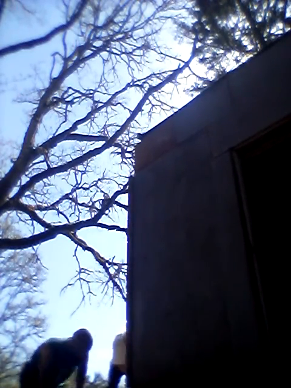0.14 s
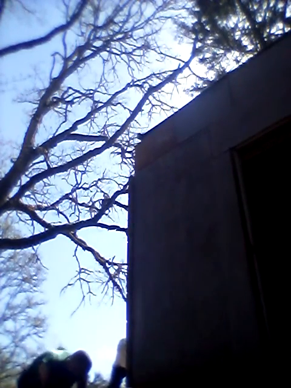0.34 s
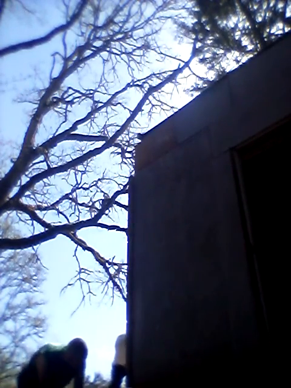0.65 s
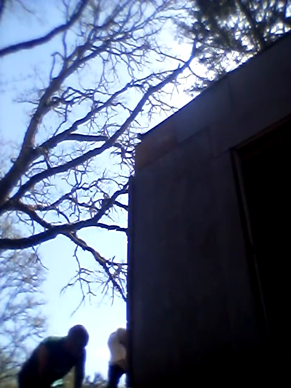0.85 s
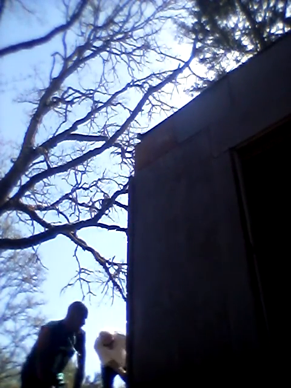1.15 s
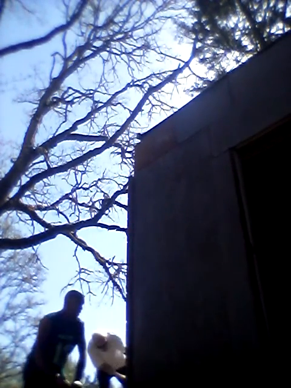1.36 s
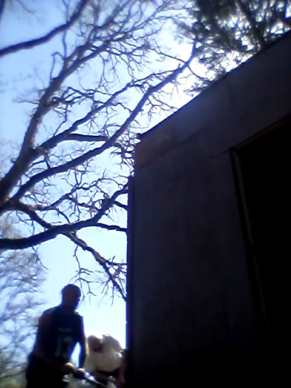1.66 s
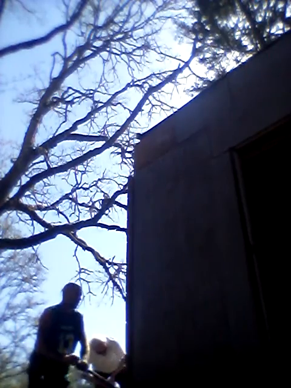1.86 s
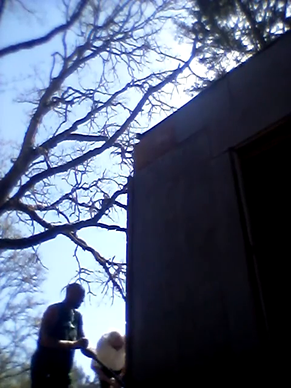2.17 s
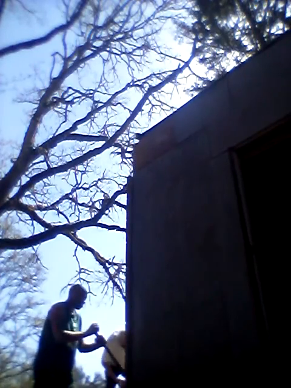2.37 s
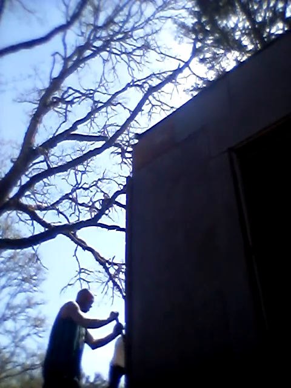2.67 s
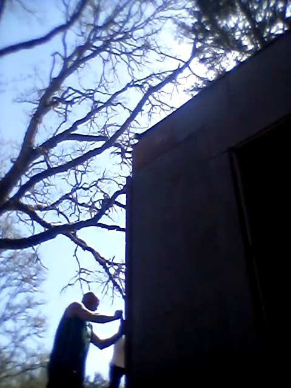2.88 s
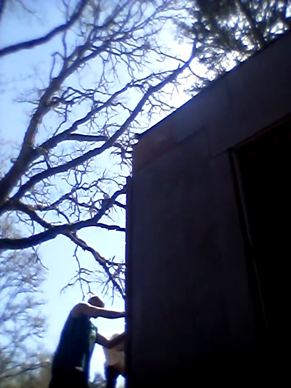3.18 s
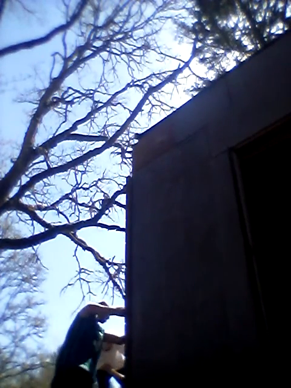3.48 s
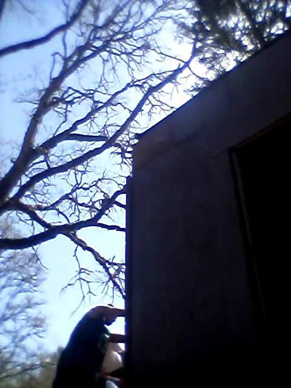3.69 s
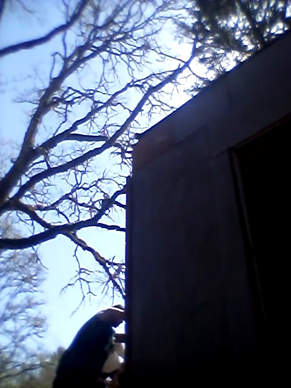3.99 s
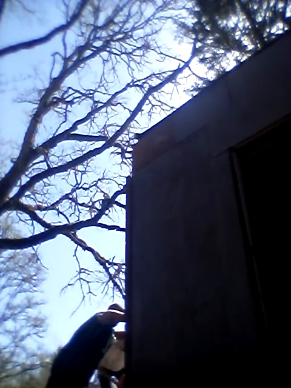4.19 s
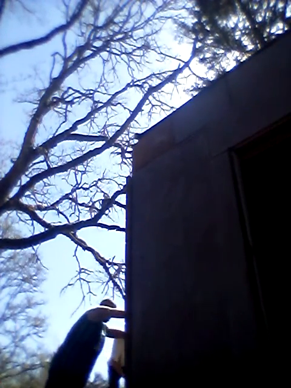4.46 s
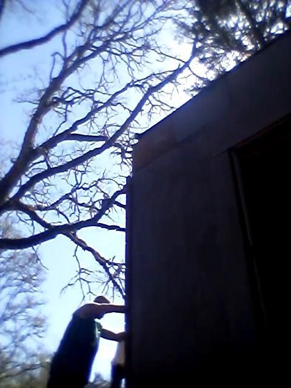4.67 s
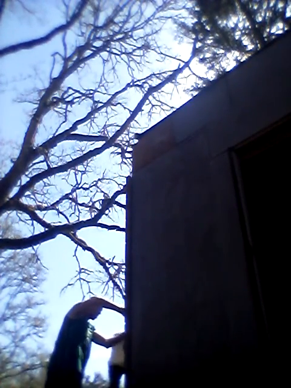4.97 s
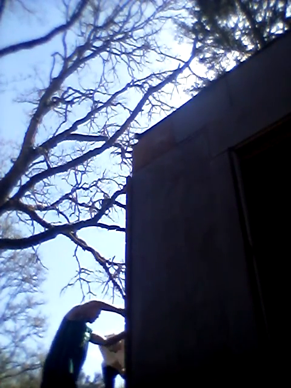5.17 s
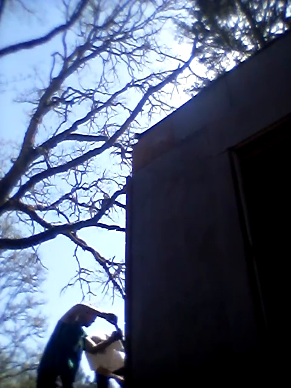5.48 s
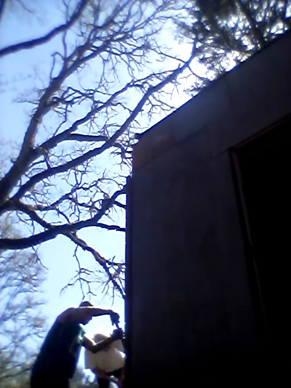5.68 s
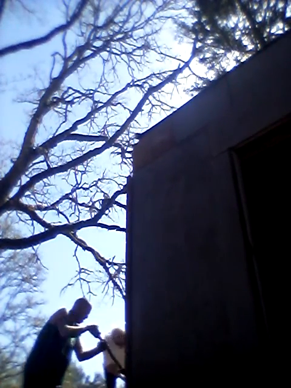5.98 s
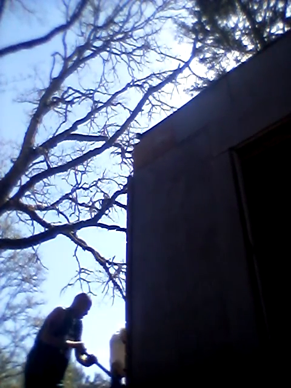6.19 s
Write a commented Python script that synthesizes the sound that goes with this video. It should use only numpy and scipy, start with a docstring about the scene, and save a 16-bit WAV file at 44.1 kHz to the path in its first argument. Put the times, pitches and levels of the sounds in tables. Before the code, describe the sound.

Outdoors by a shed, ratchet hardware scrapes and clicks, boards thump, the handle knocks loudly, then irregular cranking rattles before a final hard clack.

```python
"""Beside a wooden shed someone works a ratchet strap, in open air that runs throughout.
From the start boards rumble and steel jingles as shaped grains; jerks of the strap add rasp, scrape and rub.
Boards thump and steel clicks from the first moments, then the handle knocks: contact noise rings their modes.
A run of nine teeth taps spool and strap, cranking sounds them again, a squeak and two far bird chirps glide by.
The blows echo in the yard; a small microphone with a noise suppressor stands by the wall."""
import sys
import numpy as np
from scipy import signal
from scipy.io import wavfile
from scipy.ndimage import uniform_filter1d

SR = 44100
rng = np.random.default_rng(int(sys.argv[2]) if len(sys.argv) > 2 else 0)


def wrap_up_sound(samples):
    """Save the sound to the file named by the first command line argument, as 16-bit audio."""
    columns = np.atleast_2d(samples).T
    # keep every value between -1 and 1, then stretch to whole-number steps
    tamed = np.clip(columns, -1, 1)
    steps = np.round(tamed * 32767).astype(np.int16)
    wavfile.write(sys.argv[1], SR, steps)


N = 279682

# open air, relative spectrum: (frequency [Hz], density [dB per Hz])
AIR_SPECTRUM = [(30, -31.5), (81, -0.5), (179, 0), (319, -4.5), (384, -17), (632, -12), (1320, -5.5),
                (16000, -46)]
AIR_DB = -61.5
# handling, glided between rows: (time [s], boards rumbling [dB], steel parts jingling [dB])
HANDLING = [(0.0, -50.5, -66), (0.33, -41, -51.5), (0.85, -47, -55), (1.53, -36.5, -48), (2.04, -51, -66),
            (2.21, -61.5, -70), (2.561, -56.5, -78), (2.77, -54, -63.5), (3.461, -60, -90),
            (3.8, -39, -60.5), (3.92, -40, -52), (4.2, -42, -49), (4.33, -51.5, -71.5), (4.73, -49.5, -59),
            (5.53, -69.5, -84), (5.699, -35, -47), (5.95, -58, -76.5), (6.34, -39.5, -72)]
# relative spectra of handled boards, handled steel and dragged webbing: (frequency [Hz], density [dB per Hz])
RUMBLE_SPECTRUM = [(40, -34.5), (80, -16.5), (134, -11), (226, -1), (483, -0.5), (601, -7), (840, -20),
                   (1300, -43.5)]
JINGLE_SPECTRUM = [(1290, -39), (2200, 3.5), (2430, 20), (3560, -15.5), (5090, 7.5), (6750, -6.5),
                   (7900, -24.5), (10400, -42.5), (15100, -37.5), (16000, -54.5)]
RUB_SPECTRUM = [(700, -25), (1050, 5.5), (1500, 7.5), (2400, -0.5), (3600, -12.5)]
# the strap jerks through the spool:
# (time [s], steel rasp [dB], fade scale [s], webbing rub [dB], pitch of the scrape [Hz])
JERKS = [(0.052, -34, 0.1, -81, 6000), (0.445, -49.5, 0.18, -51, 2800), (0.493, -43.5, 0.1, -39, 6000),
         (0.697, -47.5, 0.063, -98, 5600), (0.851, -61, 0.06, -48.5, 4700),
         (0.945, -49.5, 0.021, -41, 2700), (1.027, -29, 0.058, -79, 3800),
         (1.15, -36.5, 0.086, -46.5, 5700), (1.48, -42.5, 0.033, -45, 2800), (1.593, -48, 0.14, -71, 2500),
         (1.788, -41, 0.053, -42, 5900), (3.386, -96, 0.054, -52, 2100), (3.757, -51.5, 0.16, -44, 5540),
         (4.214, -45.5, 0.063, -39, 6000), (4.503, -54, 0.11, -49.5, 6300),
         (5.517, -66, 0.062, -42.5, 5300), (5.682, -52, 0.12, -42, 3480),
         (5.927, -53.5, 0.075, -47.5, 6200), (6.152, -43.5, 0.096, -33.5, 4500)]
SCRAPE_DB, SCRAPE_OCTAVES = 2.0, 0.3  # coarse grain of a jerk: level over its rasp, width around its pitch
# above BRIGHT_HZ the rasp gains BRIGHTER dB for each dB over EVEN_DB, and loses as much below it
BRIGHT_HZ, EVEN_DB, BRIGHTER = 6400, -44.5, 0.35

# modes of boards, steel parts and handle: (nominal frequency [Hz], level [dB], t60 [s])
BOARD_MODES = [(139, -22.5, 0.071), (207.3, -9.5, 1), (301, -1.5, 0.08), (370, 3.5, 0.036),
               (467.3, 9, 0.051), (569, 11, 0.03), (677, 14, 0.026), (800.5, 13, 0.029)]
STEEL_MODES = [(2220, -13.5, 0.033), (2480, -12.5, 0.016), (2680, -12.5, 0.017), (3210, -5, 0.0033),
               (3725, -9, 0.022), (4160, -3, 0.015), (4630, 3.5, 0.0098), (5200, 0, 0.0093),
               (5600, 4.5, 0.013), (6190, -5, 0.02), (11000, -7.5, 0.0018)]
HANDLE_MODES = [(852, 7, 0.065), (1085, 14.5, 0.006), (1493, 2.5, 0.017), (1605, -3.5, 0.027),
                (1673, -6.5, 0.013), (1740, -1.5, 0.021), (2150, -1.5, 0.02), (2456, -21, 0.008),
                (3130, 8, 0.0051), (4460, 13, 0.0068)]
DETUNE = 0.022  # every blow finds the parts seated a little differently: spread of the mode pitches
# thumps on the boards: (time [s], peak [dB], pitch rung most [Hz])
THUMPS = [(0.067, -17.5, 494), (0.193, -21.5, 556), (0.339, -36, 770), (0.46, -25.5, 466),
          (0.783, -32, 416), (1.033, -27, 730), (1.184, -23.5, 296), (1.275, -27, 476), (1.487, -21.5, 297),
          (1.794, -28.5, 550), (2.02, -34, 490), (2.186, -44, 307), (2.589, -33, 370), (2.759, -27, 750),
          (3.082, -34, 621), (3.45, -38, 244), (3.661, -25.5, 556), (3.79, -25, 486), (4.187, -20.5, 500),
          (4.47, -32, 684), (4.519, -31, 690), (4.65, -32, 229), (4.817, -28, 755), (5.058, -15.5, 427),
          (5.522, -34.5, 654), (5.59, -22, 556), (5.668, -25.5, 580), (5.933, -34.5, 456),
          (6.153, -18.5, 500)]
# clicks, steel on steel: (time [s], peak [dB])
CLICKS = [(0.129, -33), (0.196, -14.5), (0.34, -14), (1.6489, -11), (1.9773, -11.5), (2.6328, -14),
          (2.7612, -19), (3.8352, -12.5), (4.5213, -31), (4.8227, -14), (5.127, -35.5), (5.6611, -11.5),
          (6.001, -33.5), (6.0784, -36), (6.242, -33)]
THUMP_S, CLICK_S = 0.042, 0.009  # time scale of the contact chatter, s
# knocks of the handle: (time [s], peak [dB], pitch rung most [Hz], contact [s])
KNOCKS = [(1.369, -0.5, 1370, 0.0036), (1.573, -10.5, 1540, 0.0039), (2.421, -42, 1570, 0.006),
          (2.48, -41, 1600, .008), (2.509, -42, 1560, .006), (2.634, -27, 1200, 0.021),
          (2.761, -28, 1120, 0.011), (2.882, -17, 1560, .004), (3.077, -24, 1210, 0.01),
          (3.461, -37, 1808, 0.012), (3.509, -22, 1350, 0.0047), (3.52, -11.5, 1780, 0.0036),
          (3.541, -22.5, 960, 0.0038), (3.641, -39, 1410, 0.0047), (3.661, -19.5, 1970, 0.009),
          (3.714, -39, 1700, .006), (3.761, -28.5, 1500, 0.0048), (3.81, -26, 1470, 0.0076),
          (3.87, -29.5, 1700, 0.0023), (3.908, -30.5, 1780, 0.0091), (3.961, -27, 1800, 0.0073),
          (4.001, -27.5, 1860, 0.0061), (4.037, -37.5, 1510, .006), (4.064, -23.5, 1900, .008),
          (4.147, -39, 1160, 0.0087), (4.216, -27, 1520, .006), (4.245, -27, 1460, .006),
          (4.447, -26, 1390, 0.0023), (4.521, -28, 1340, 0.0066), (5.057, -10, 2040, 0.0067),
          (5.584, -3, 1144, 0.0039), (5.613, -16.5, 2070, 0.0075), (5.65, -8.5, 1310, 0.0027),
          (5.655, -15, 1200, 0.0046), (5.744, -25, 1920, 0.0052), (5.998, -28.5, 1420, 0.004),
          (6.067, -24.5, 2050, 0.0032)]
# how long the yard rings: (frequency [Hz], t60 [s])
YARD_T60 = [(200, 0.44), (1000, 0.11), (5000, 0.4), (12000, 0.23)]
YARD_DB = -15.5

RUN_S, TOOTH_S = 1.656, 0.0437  # quick even run over the slack strap: first tooth, spacing
TOOTH_DB, TAP_S = -33.5, 0.0017  # nominal level of a tooth, rise of its ring in s
SPOOL_HZ, SPOOL_T60 = 792, 0.044
SLACK_HZ, TAUT_HZ = 487, 566  # nominal hum of the strap
STRAP_DB, STRAP_T60 = -2.5, 0.15  # level of the hum relative to the spool, its decay in s
SAG_PER_S = 1.8  # share of its nominal pitch that the hum loses in a second as the strap slackens
# while the handle is cranked against the load each knock also sounds spool and strap
CRANK_FROM_S, CRANK_TO_S = 3.65, 4.16
CRANK_DB, CRANK_SHARE = -13.5, 0.51  # level = this + a share of the knock's dB

# a faint squeak under strain, and a distant bird:
# (time [s], length [s], start pitch [Hz], end pitch [Hz], level [dB])
SQUEAK = [(4.4, 0.069, 1640, 1510, -55.5)]
CHIRPS = [(5.394, 0.037, 4260, 4450, -62), (5.489, 0.024, 4600, 4280, -64)]

HISS_DB = -76  # level of the noise that is thinned into capsule hiss
CUTOFF_HZ = 16500


def amp(db):
    """Decibels to gain."""
    return 10 ** (np.asarray(db) / 20)


def rms_one(x):
    """Scaled to rms 1."""
    return x / np.sqrt(np.mean(x ** 2) + 1e-20)


def at_hz(points, hz):
    """Reads a (Hz, value) table on a log frequency axis."""
    table = np.array(points)
    return np.interp(np.log(hz), np.log(table[:, 0]), table[:, 1])


def drift(rate_hz):
    """Slow random wander of spread 1: noise through two equal low-pass poles, at a fortieth of the rate."""
    r = np.exp(-80 * np.pi * rate_hz / SR)
    noise = rng.standard_normal(N // 40 + 2002)
    slow = signal.lfilter([1], [1, -2 * r, r * r], noise)[2000:]  # skip the settling
    return np.interp(np.arange(N) / 40, np.arange(len(slow)), rms_one(slow))


def bands(pair):
    """Half-octave slices of two noises dealt in turn, each with its centre in Hz."""
    edges = 40 * 2 ** np.arange(0, 9.1, 1 / 2)
    for k, (lo, hi) in enumerate(zip(edges, edges[1:])):
        sos = signal.butter(2, [lo, hi], "band", fs=SR, output="sos")
        yield np.sqrt(lo * hi), signal.sosfilt(sos, pair[k % 2])


def coloured(pair, spectrum, patchy_db, rate_hz):
    """Noise or grains shaped band by band, each band flickering partly with the rest; rms 1."""
    together, out = drift(rate_hz), np.zeros(N)
    low, high = spectrum[0][0], spectrum[-1][0] * 1.2
    for hz, band in bands(pair):
        if low < hz < high:
            flicker_db = patchy_db * (.5 * together + drift(rate_hz))
            out += amp(at_hz(spectrum, hz) + flicker_db) * band
    return rms_one(out)


def grains(per_s, spread_db):
    """Two trains of tiny random contacts of uneven size."""
    uneven = amp(spread_db * np.minimum(rng.exponential(1, (2, N)), 4))
    sizes = uneven * rng.standard_normal((2, N))
    return sizes * (rng.random((2, N)) < per_s / SR) + 1e-18


def shaken(modes, per_s):
    """Dense tiny contacts keep the modes of a body ringing, each a two-pole resonator; rms 1."""
    contacts, out = grains(per_s, spread_db=-0.5)[0], np.zeros(N)
    for hz, level_db, t60 in modes:
        r, w = amp(-60 / (t60 * SR)), 2 * np.pi * hz / SR
        out += amp(level_db) * signal.lfilter([0, np.sin(w)], [1, -2 * r * np.cos(w), r * r], contacts)
    return rms_one(out)


def jerk_shape(start, fade_s):
    """The place and swell of one jerk: a rise of a few milliseconds, then an ever steeper fade."""
    near = slice(round(start * SR), round((start + 4 * fade_s) * SR))
    since = np.arange(N)[near] / SR - start
    age = since / fade_s
    return near, np.clip(since / 0.0056, 0, 1) * np.exp(-0.8 * age - 0.82 * age ** 2)


def blows(events, modes, focus_db, hard_hz, duller_db, first_db, swell, rattle_db, rattle_t60, damped=0):
    """Each blow is a firm first impact, a short chatter and a dying rattle that ring the modes."""
    out, t = np.zeros(N + SR), np.arange(SR // 3) / SR
    hz, level_db, t60 = np.transpose(modes)[:, :, None]
    early = t[:SR // 10]  # every ring is cut at a tenth of a second
    for s, peak_db, centre_hz, contact_s in events:
        # modes away from the pitch rung most lose focus_db an octave
        lean_db = -focus_db * np.abs(np.log2(hz / centre_hz))
        seated_hz = hz * (1 + DETUNE * rng.standard_normal(hz.shape))
        rings = np.sin(2 * np.pi * seated_hz * early) * amp(-60 * early / t60)
        uneven_db = 2.5 * rng.standard_normal(hz.shape)
        body = (amp(level_db + lean_db + uneven_db) * rings).sum(0)
        loose = body * amp(-damped * early)  # rattling parts lose `damped` more dB a second

        # the contact is an octave duller for each duller_db lighter
        top_hz = np.clip(hard_hz * 2 ** (peak_db / duller_db), 2 * hz.min(), .45 * SR)
        give = signal.butter(3, [hz.min() * 0.79, top_hz], "band", fs=SR, output="sos")
        age = t / np.clip(contact_s, .001, .1)
        chatter = np.minimum(age / swell, 1) * rng.standard_normal(t.size)
        force = chatter * np.exp(-2 * age ** 2)
        force[np.argmax(age > swell)] += amp(first_db)  # the first impact
        rattle = chatter * amp(rattle_db - 60 * t / rattle_t60)

        sound = signal.fftconvolve(body, signal.sosfilt(give, force))
        sound += signal.fftconvolve(loose, signal.sosfilt(give, rattle))
        at = round(s * SR)
        out[at:at + sound.size] += amp(peak_db) * sound / np.abs(sound).max()
    return out[:N]


def glides(rows):
    """Short whistles: sines that glide evenly in pitch under a smooth swell."""
    out = np.zeros(N)
    for s, length, from_hz, to_hz, level_db in rows:
        count, at = round(length * SR), round(s * SR)
        phase = 2 * np.pi * np.cumsum(np.linspace(from_hz, to_hz, count)) / SR
        out[at:at + count] = amp(level_db) * np.hanning(count) * np.sin(phase)
    return out


def open_air():
    """A bed of shaped noise whose bands wander slowly in level."""
    return amp(AIR_DB) * coloured(rng.standard_normal((2, N)), AIR_SPECTRUM, patchy_db=4.5, rate_hz=2)


def boards_rumble():
    """Fine contacts and ringing board modes rumble while the strap is pulled about."""
    s, level_db, _ = np.transpose(HANDLING)
    rumble = coloured(grains(1500, spread_db=1.0), RUMBLE_SPECTRUM, patchy_db=3.0, rate_hz=5.7)
    rumble += amp(-5.5) * shaken(BOARD_MODES, 250)
    return amp(np.interp(np.arange(N) / SR, s, level_db)) * rumble


def steel_jingle():
    """Loose steel jingles as dense contacts ring its modes; jerks rasp it, and harder rasping is brighter."""
    s, _, level_db = np.transpose(HANDLING)
    rasp = amp(np.interp(np.arange(N) / SR, s, level_db))
    for start, rasp_db, fade_s, _, _ in JERKS:
        near, shape = jerk_shape(start, fade_s)
        rasp[near] += amp(rasp_db) * shape
    jingle = coloured(grains(14000, spread_db=0.0), JINGLE_SPECTRUM, patchy_db=4.0, rate_hz=14.0)
    jingle += amp(-5.5) * shaken(STEEL_MODES, 10000)
    jingle += amp(-17.0) * shaken(STEEL_MODES, 200)
    treble = signal.sosfilt(signal.butter(2, BRIGHT_HZ, "high", fs=SR, output="sos"), jingle)
    brightened = jingle + treble * ((rasp / amp(EVEN_DB)) ** BRIGHTER - 1)
    return rasp * brightened


def spool_scrape():
    """Coarse grit in a narrow band around the pitch of each jerk."""
    out, grit = np.zeros(N), grains(2700, spread_db=3.5)[0]
    for start, rasp_db, fade_s, _, hz in JERKS:
        near, shape = jerk_shape(start, fade_s)
        edges_hz = hz * 2 ** (np.array([-.5, .5]) * SCRAPE_OCTAVES)
        band = signal.butter(2, edges_hz, "band", fs=SR, output="sos")
        out[near] += amp(rasp_db + SCRAPE_DB) * shape * rms_one(signal.sosfilt(band, grit[near]))
    return out


def webbing_rub():
    """Webbing drags through the spool at each jerk: a flood of fine contacts, shaped and flickering."""
    level = np.zeros(N)
    for start, _, fade_s, rub_db, _ in JERKS:
        near, shape = jerk_shape(start, fade_s)
        level[near] += amp(rub_db) * shape
    return level * coloured(grains(6000, spread_db=-1.0), RUB_SPECTRUM, patchy_db=4.0, rate_hz=5.0)


def board_thumps():
    """Soft, strong first impacts boom in the low board modes nearest the pitch rung most."""
    return blows([(*row, THUMP_S) for row in THUMPS], BOARD_MODES, focus_db=21.5, hard_hz=2500, duller_db=40.5,
                 first_db=34.0, swell=0.18, rattle_db=22.0, rattle_t60=0.28)


def yard(x):
    """Scattered echoes from wall, load and trees: a noise tail that dies band by band."""
    t = np.arange(SR // 2) / SR
    tail = np.zeros(t.size)
    for hz, band in bands(rng.standard_normal((2, t.size))):
        tail += band * amp(-60 * t / at_hz(YARD_T60, hz))
    tail *= np.minimum(t / 0.0032, 1)  # the first echoes take a moment to build
    return signal.fftconvolve(x, tail / np.sqrt(np.sum(tail ** 2)))[:N]


def steel_clicks():
    """Pawl and hooks click: hard contact rings the steel, and a heavily damped rattle follows."""
    events = [(s, db, STEEL_MODES[0][0], CLICK_S) for s, db in CLICKS]
    return blows(events, STEEL_MODES, focus_db=3.0, hard_hz=14500, duller_db=27.5, first_db=7.0,
                 swell=0.088, rattle_db=-11.0, rattle_t60=0.29, damped=7400)


def handle_knocks():
    """Short chattering contacts ring the handle's modes, most of all near each knock's own pitch."""
    return blows(KNOCKS, HANDLE_MODES, focus_db=16.0, hard_hz=7900, duller_db=40.0, first_db=3.5,
                 swell=0.65, rattle_db=-13.0, rattle_t60=0.072)


def teeth():
    """Each tooth is a clean soft tap: the spool rings briefly, the strap hums and sags from its tension's pitch."""
    events = [(RUN_S + k * TOOTH_S, TOOTH_DB, SLACK_HZ) for k in range(9)]
    for s, db, *_ in KNOCKS:
        if CRANK_FROM_S < s < CRANK_TO_S:
            events.append((s, CRANK_DB + CRANK_SHARE * db, TAUT_HZ))
    out, t = np.zeros(N + SR), np.arange(SR // 4) / SR
    spool = np.sin(2 * np.pi * SPOOL_HZ * t) * amp(-60 * t / SPOOL_T60)
    for s, level_db, strap_hz in events:
        pitch = strap_hz * (1 + .04 * rng.standard_normal() - SAG_PER_S * t)
        strap = np.sin(2 * np.pi * np.cumsum(pitch) / SR) * amp(STRAP_DB - 60 * t / STRAP_T60)
        gain = amp(level_db + rng.standard_normal())
        at = round(s * SR)
        out[at:at + t.size] += gain * np.minimum(t / TAP_S, 1) * (spool + strap)
    return out[:N]


def strain_squeak():
    """A faint squeak under strain: one sine sliding down."""
    return glides(SQUEAK)


def distant_bird():
    """Two faint chirps, one gliding up and one down."""
    return glides(CHIRPS)


def scene():
    """Open air, the handled strap, blows with their echoes, the squeak and the bird."""
    handling = boards_rumble() + steel_jingle() + spool_scrape() + webbing_rub()
    hits = board_thumps() + steel_clicks() + handle_knocks() + teeth()
    echoes = amp(YARD_DB) * yard(hits)
    return (open_air() + handling + hits + echoes + strain_squeak() + distant_bird())[None]


def record(dry):
    """The suppressor slowly turns quiet moments down and recovers at once; peaks are rounded, the top is cut."""
    dry = dry + amp(HISS_DB) * np.diff(rng.standard_normal(N + 1))  # the capsule's own thin hiss
    level_db = 10 * np.log10(uniform_filter1d(dry ** 2, size=661) + 1e-12)
    fall_db = 120 * np.arange(N) / SR  # the held level falls 120 dB a second
    held_db = np.maximum.accumulate(level_db + fall_db, axis=1) - fall_db
    gated = dry * amp(np.clip(held_db + 48.5, -20, 0))
    # small capsule, no deep bass
    thinned = signal.sosfilt(signal.butter(3, 55, "high", fs=SR, output="sos"), gated)
    rounded = np.tanh(thinned * np.sqrt(1 + thinned ** 2)) * .97
    return signal.sosfilt(signal.cheby2(16, 70, CUTOFF_HZ, fs=SR, output="sos"), rounded)


dry = scene()
out = record(dry)
wrap_up_sound(out)
```